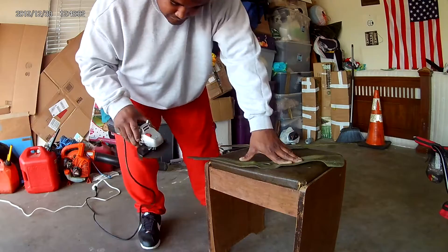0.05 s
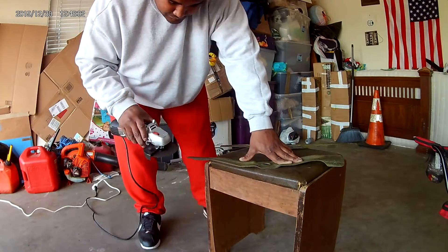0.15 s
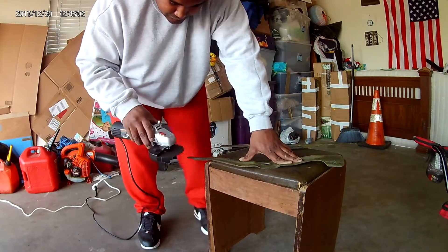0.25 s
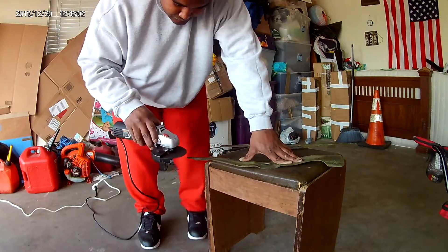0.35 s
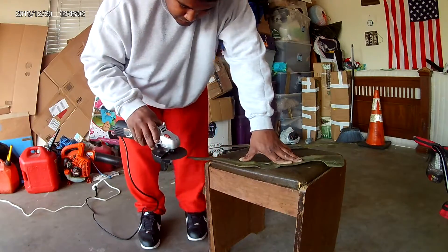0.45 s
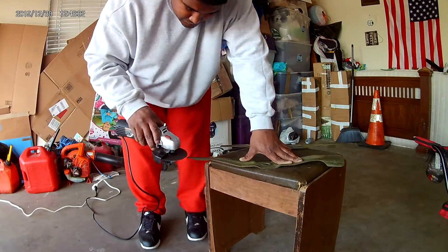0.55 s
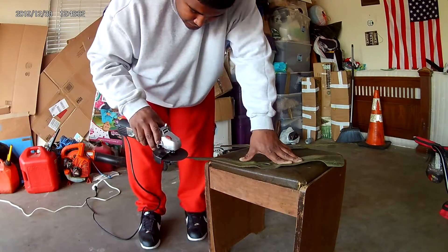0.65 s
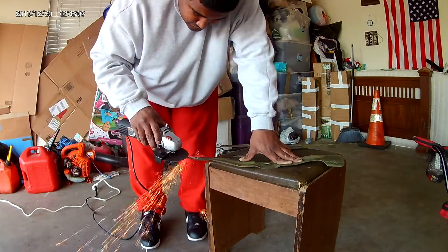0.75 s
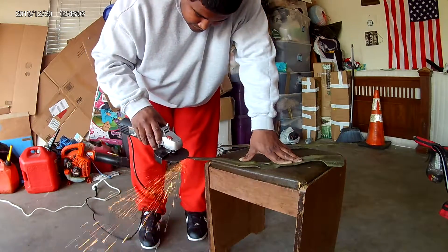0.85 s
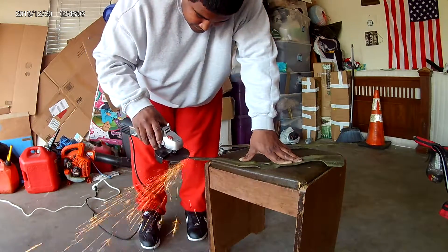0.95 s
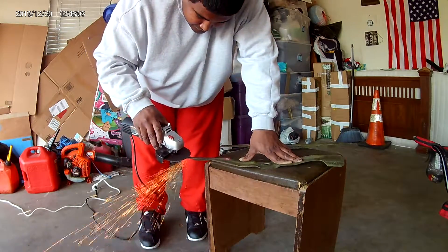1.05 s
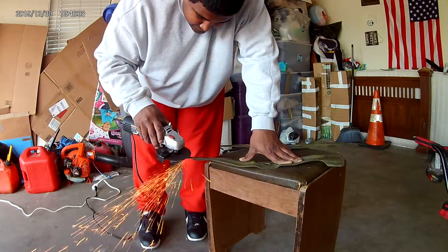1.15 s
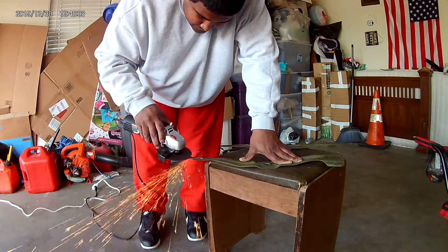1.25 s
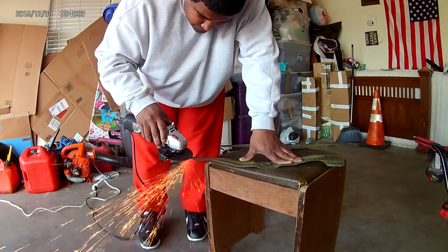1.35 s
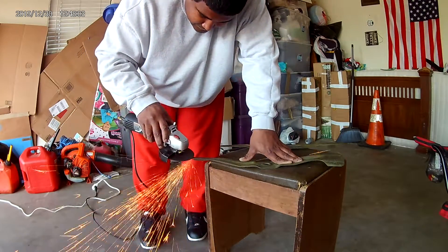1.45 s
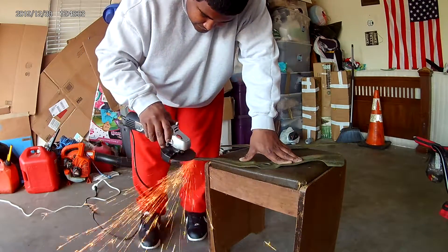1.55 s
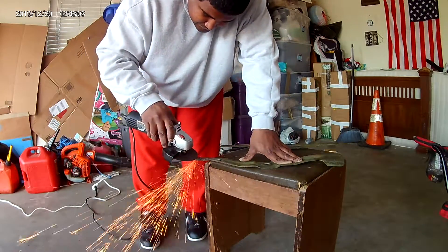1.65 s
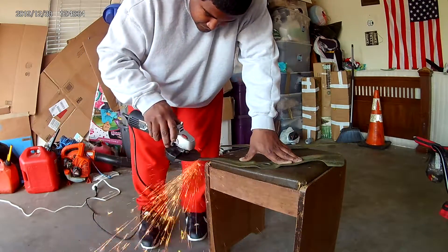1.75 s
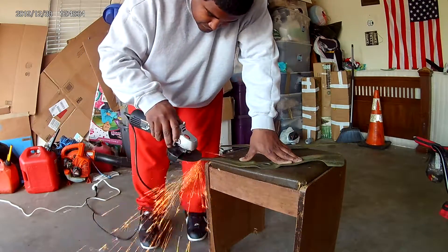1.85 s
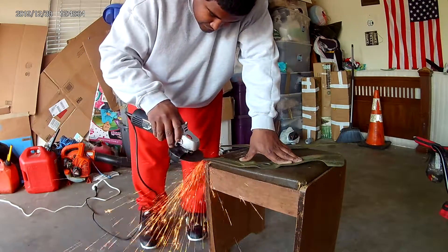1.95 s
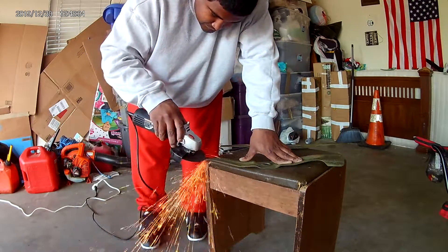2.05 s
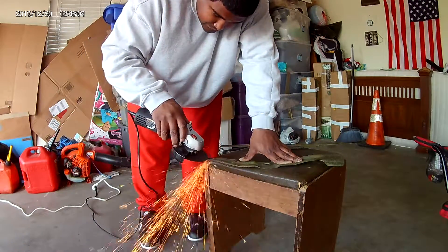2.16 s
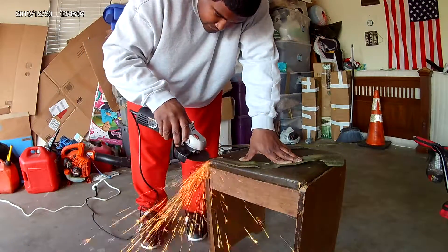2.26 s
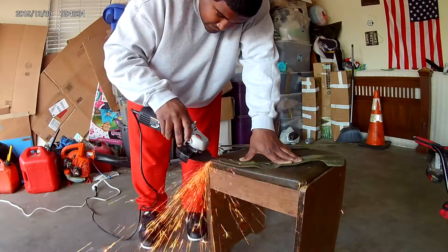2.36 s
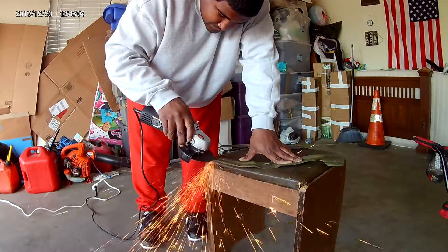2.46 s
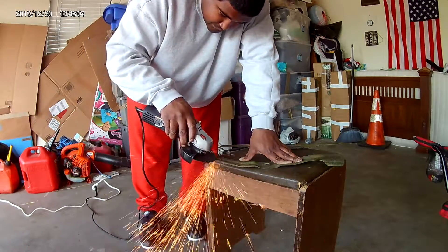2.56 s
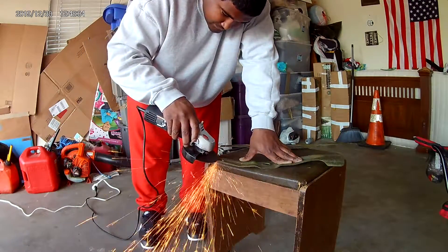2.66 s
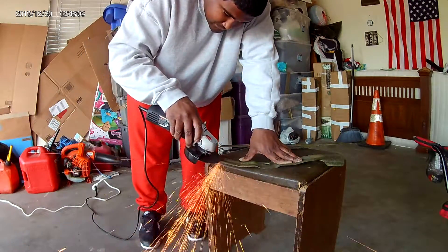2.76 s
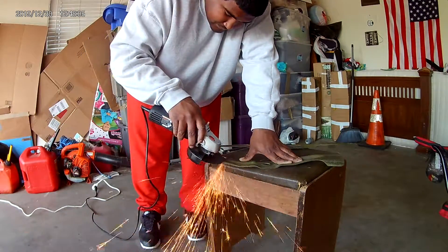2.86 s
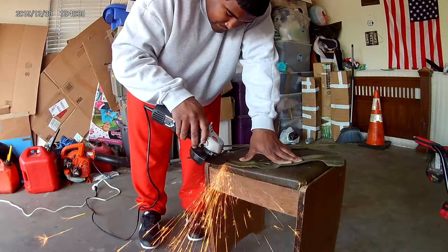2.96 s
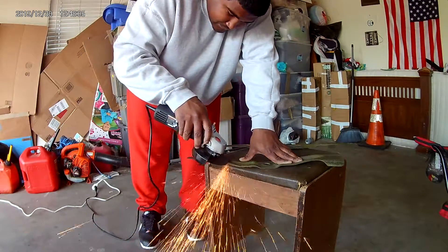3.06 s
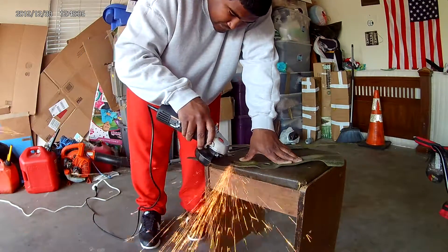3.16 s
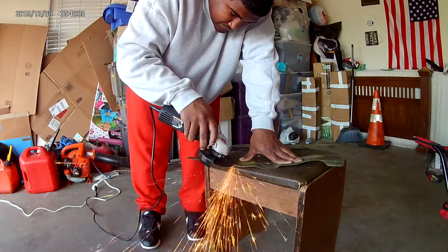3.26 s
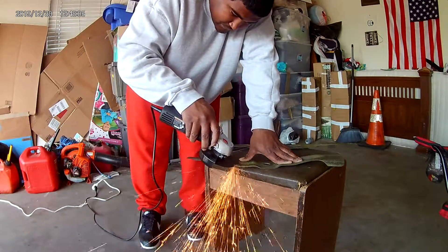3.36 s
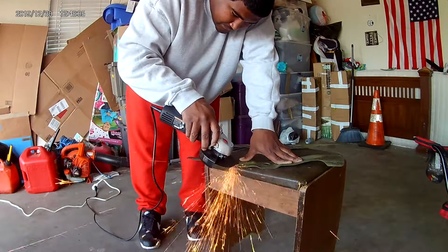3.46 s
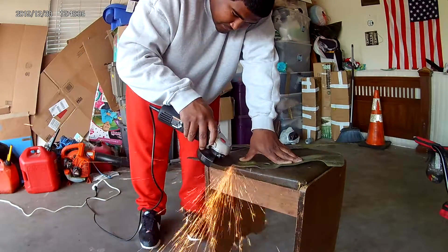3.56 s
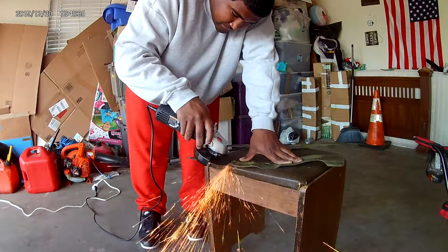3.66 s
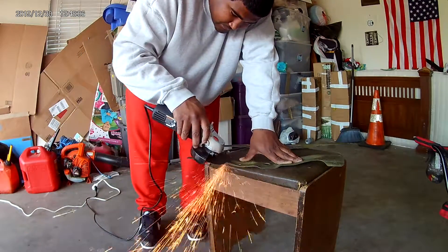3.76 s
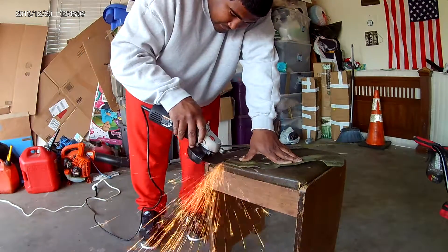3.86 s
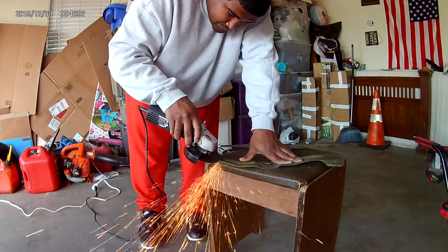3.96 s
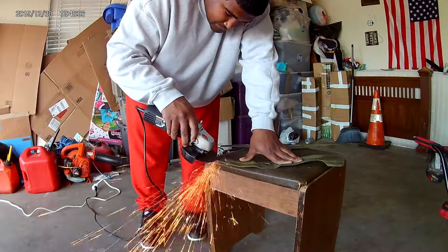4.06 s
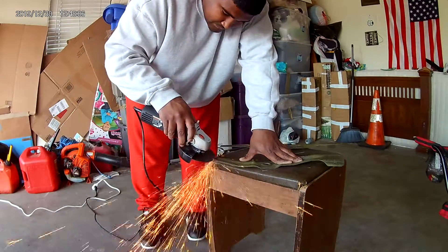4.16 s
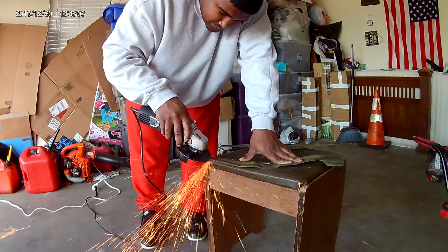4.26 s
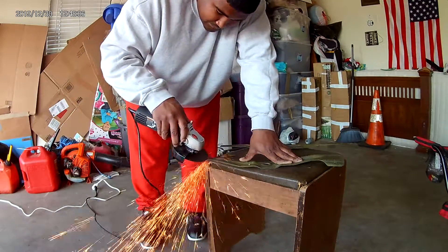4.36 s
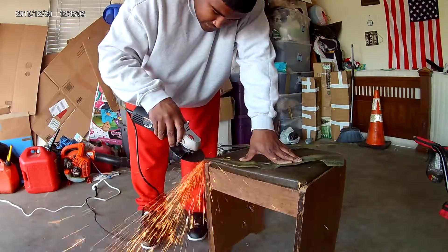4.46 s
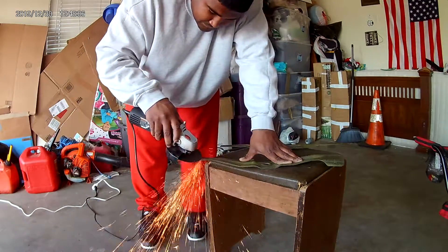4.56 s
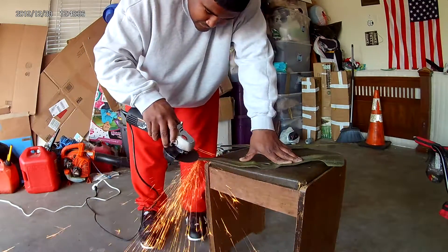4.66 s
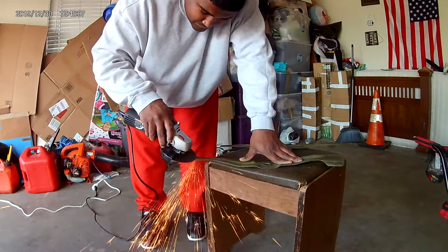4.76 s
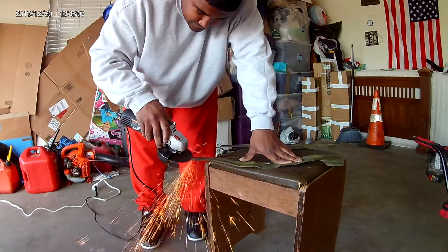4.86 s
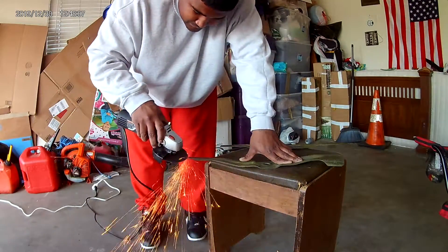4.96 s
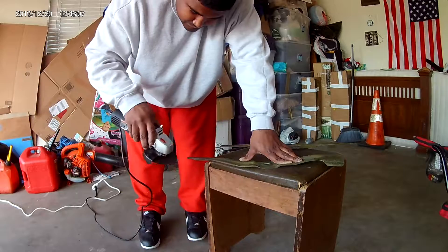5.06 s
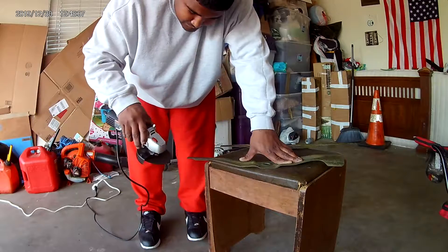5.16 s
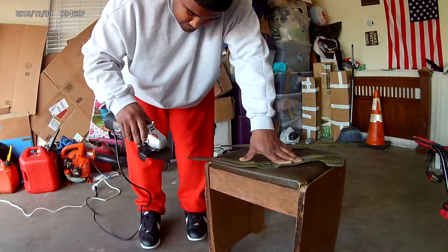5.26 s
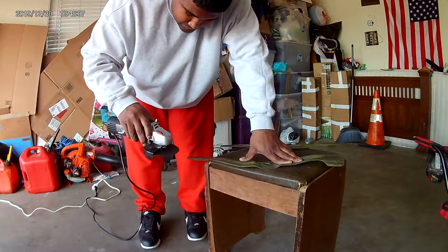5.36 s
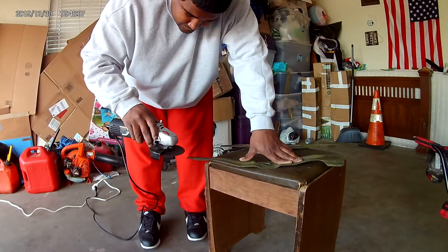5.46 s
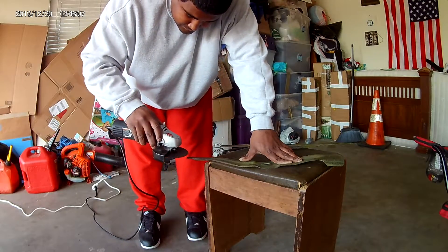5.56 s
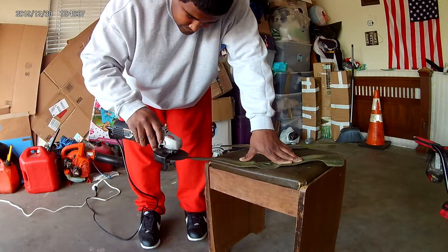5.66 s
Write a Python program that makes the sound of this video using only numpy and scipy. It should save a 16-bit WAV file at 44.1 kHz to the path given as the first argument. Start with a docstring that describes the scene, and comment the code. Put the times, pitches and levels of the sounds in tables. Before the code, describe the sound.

From 0 to 0.7 seconds an electric angle grinder spins freely, close by in a cluttered garage: a steady, slightly rattling geared whine with a broad airy fan rush, swelling early then dipping. At about 0.7 the disc bites a steel blade with a sudden rough screech, loudest and raspiest at first. One unbroken grinding pass follows until 5.0: dense buzzing grit, fast roughness from every disc turn, and overlapping metallic squeals, mostly around 2 to 4 kilohertz, that swell and die as the contact slides along the edge. Disc speed sags gradually by about a tenth until 4.3, lowering the tones, and a low hum grows as the blade is worked over the bench, strongest near 3.4. Around 5.0 the grinder lifts with a last brief screech, a low bump and a tiny hard snap. The free whine and fan rush return, rising quickly in pitch and holding to 5.7. Reverberation is short and dull.

```python
"""Angle grinder on a steel blade

An angle grinder runs free in a cluttered garage, is pressed on a steel blade for one long pass, and is lifted.
The uneven rim rubs the same pattern into the steel on every turn: a comb of lines on the sagging disc speed.
Lines swell in the blade's resonances as the contact slides along the edge, and many squeal in turn.
Shaped noise makes the rasping grit, screeches and rushing fan; sines make the hum and the motor tones.
"""
import sys
import numpy as np
from scipy import signal
from scipy.fft import rfft, irfft
from scipy.io import wavfile

SR = 44100
rng = np.random.default_rng(int(sys.argv[2]) if len(sys.argv) > 2 else 0)


def wav_record(signal):
    """Record a signal, one row per channel, as 16-bit PCM in the file named by sys.argv[1]."""
    frames = np.transpose(np.atleast_2d(signal))
    bounded = np.clip(frames, -1, 1)
    # unit amplitude maps onto the largest positive 16-bit level
    quanta = np.round(bounded * 32767).astype(np.int16)
    wavfile.write(sys.argv[1], SR, quanta)


N = 251804

# level of the motor whine, swelling and fading as the grinder moves through the garage's standing waves:
# start_s, level_db
WHINE_LEVEL = [(0, 3), (.2, 6.5), (.32, -1.5), (.65, -5.5), (1.3, 5.5), (2.1, 4.5), (2.4, -10), (2.8, 2),
               (5.71, 0)]
GEAR_RATIO = 37 / 12  # shaft turns per disc turn
PRESS_S, LIFT_S = 0.711, 5.03  # the disc meets and leaves the blade
ATTACK_S, RELEASE_S = 0.045, 0.024
CONTROL_COUNT = 3000  # points in a slow control


def undb(db):
    """Decibels to gain: 20 dB is a factor of ten in amplitude."""
    return np.exp(np.asarray(db) * (np.log(10) / 20))


def unit(x):
    """Normalisation to an rms of one."""
    return x / np.sqrt(np.mean(x ** 2))


def curve(rows):
    """Linear interpolation of (s, value) rows over the whole scene."""
    return np.interp(np.arange(N) / SR, *np.transpose(rows))


def stretch(x, size):
    """Linear resampling of a slow control to `size` points."""
    return np.interp(np.linspace(0, len(x) - 1, size), np.arange(len(x)), x)


def shape_db(hz, points):
    """Spectral envelope: (Hz, dB) points joined on a log-frequency axis."""
    point_hz, db = np.transpose(points)
    return np.interp(np.log(hz + 1), np.log(point_hz), db)


def colour(x, points):
    """Spectral filtering by a (Hz, dB) envelope; rms one."""
    bin_hz = np.arange(N // 2 + 1) * SR / N
    return unit(irfft(rfft(x) * undb(shape_db(bin_hz, points)), N))


def resonate(x, hz, width):
    """Simple resonance: a two-pole band-pass with gain one at its centre."""
    return signal.lfilter(*signal.iirpeak(hz, hz / width, fs=SR), x)


def walk(rate, size=N):
    """Random modulation with a spread near one and `rate` new values a second, in `size` steps."""
    at = np.linspace(0, N / SR * rate, size) + rng.random()
    knots = rng.standard_normal(4096)
    return np.sqrt(3 / 2) * np.interp(at, np.arange(len(knots)), knots)


def garage(x, t60=0.43, wet_db=-16):
    """Reverberation: short, dull, exponentially decaying reflections among stacked boxes."""
    t = np.arange(SR // 2) / SR
    tail = rng.standard_normal(len(t)) * np.exp(-np.log(1000) * t / t60) * (t > .005)
    tail = resonate(tail, 2740, 5400)
    tail /= np.sqrt(np.sum(tail ** 2))
    return x + undb(wet_db) * signal.fftconvolve(x, tail)[:N]


def disc_speed(free_hz=161.1, recover_s=0.38, hunt=0.00392, hunt_rate=5):
    """Motor load: the free disc hunts a little, sags while grinding and runs back up exponentially."""
    # disc speed, sagging under load: start_s, turns_hz
    loaded_speed = [(.72,161.6),(.88,160.2),(1.14,157.8),(1.6,153.1),(2,152.1),(2.25,150.4),(2.7,148.3),(3.28,147.7),(3.6,146.4),(4,145.9),(4.26,145.2),(4.74,146.3),(5.05,148.4)]
    t = np.arange(N) / SR
    before = np.clip((PRESS_S - t) / ATTACK_S, 0, 1)
    after = 1 - np.exp(-np.maximum(t - LIFT_S, 0) / recover_s)
    free = np.maximum(before, after)
    return free * free_hz * (1 + hunt * walk(hunt_rate)) + (1 - free) * curve(loaded_speed)


def contact():
    """Friction contact as a share of full grip, 0-1: a quick press, a long hold, a quick lift."""
    t = np.arange(N) / SR
    press = np.clip((t - PRESS_S) / ATTACK_S, 1e-4, 1)
    return press * np.exp(-np.clip((t - LIFT_S) / RELEASE_S, 0, 10))


def machine(turns, bite_db, rush_db=-33.5, rattle_db=1.94, swish=0.032, knock_db=2, knock_lag=0.058,
            scatter_db=2.0, loaded_db=-5, whine_share=0.03):
    """Turbulence and forced resonance: fan rush, and housing rings that slack gears knock, less under load."""
    # rush of the cooling fan and gears, relative spectrum: pitch_hz, level_db
    rush = [(30, -18), (100, -23), (220, -19.5), (380, -10), (650, -5), (850, -1.5), (1300, -0.5),
            (1700, -3), (2200, 3), (3200, -1), (4000, -3), (4260, -7.5), (4850, -4), (5250, -9.5),
            (5900, -1.5), (6400, -16), (6700, -5.5), (7200, -16), (8300, -32), (12500, -28), (15000, -60)]
    # resonances of the gear head and guard: pitch_hz, width_hz (of each of two passes), level_db
    housing = [(837, 146, -48), (1352, 270, -41), (2132, 91, -41), (3030, 92, -45.5), (3490, 100, -49),
               (3894, 117, -40)]
    load = np.clip(undb(bite_db), 0, 1)
    # shaft and disc drift in and out of step about 13 times a second, and the gears knock each time
    beat = np.cos(2 * np.pi * ((GEAR_RATIO % 1) * turns - knock_lag)) * (1 - load / 2)
    # the disc fans the air once a turn
    fanning = 1 + swish * np.sin(2 * np.pi * turns)
    out = colour(rng.standard_normal(N), rush) * fanning * undb(rush_db + rattle_db * walk(420))
    for hz, width, db in housing:
        knocks = rng.standard_normal(N) * undb(knock_db * beat + scatter_db * walk(160))
        out += undb(db) * unit(resonate(resonate(knocks, hz, width), hz, width))
    # all of it rises and falls very slightly with the whine and is quieter under load
    return out * undb(loaded_db * load + whine_share * curve(WHINE_LEVEL))


def motor(turns, lash=0.39, waver_db=2.5):
    """Harmonics of a geared shaft; lash is a phase modulation (rad) that smears the higher tones most."""
    # tones of the motor shaft and fan: shaft_multiple, level_db (before waver and whine level)
    shaft_tones = [(1, -45.5), (2, -44), (3, -45), (4, -46), (6, -55), (8, -50)]
    out, play = np.zeros(N), lash * walk(40)
    for multiple, db in shaft_tones:
        phase = multiple * (2 * np.pi * GEAR_RATIO * turns + play)
        out += undb(db + waver_db * walk(14)) * np.sin(phase)
    return out * undb(curve(WHINE_LEVEL))


def disc_whine(turns, grip, slip_rad=0.9, waver_db=2.5, whine_share=0.99):
    """Rotational harmonics of the free disc, wavering, that swell and fade along with the motor whine."""
    # tones of the spinning disc and gear head: disc_multiple, level_db (before waver and whine level)
    disc_tones = [(8, -57), (13, -48), (15, -53), (24, -53)]
    out = np.zeros(N)
    for multiple, db in disc_tones:
        phase = 2 * np.pi * multiple * turns + slip_rad * walk(40)
        out += undb(db + waver_db * walk(22)) * np.sin(phase)
    return out * (1 - grip) * undb(whine_share * curve(WHINE_LEVEL))


def wobble(turns, grip, place, free_db=-61.5, blade_db=-52, bench_db=-35, falloff_db=45, waver_db=1.0,
           free_octave_db=-63, octave_waver_db=2.0, bump_db=6, bump_s=0.02):
    """Radiation of the once-a-turn hum and its octave: faint in air, stronger on the blade and over the bench."""
    # level of the hum's octave while the disc grinds: start_s, level_db (before waver)
    octave_level = [(.8, -46.5), (1.02, -45), (1.2, -67), (1.45, -54), (2.12, -53), (2.38, -67),
                    (2.72, -49.5), (3.6, -48.5), (5, -46.5)]
    t = np.arange(N) / SR
    pressed = np.hypot(undb(blade_db), undb(bench_db - falloff_db * (1 - place)))
    # the hum swells briefly at the lift
    bump = bump_db * np.exp(-((t - LIFT_S) / bump_s) ** 2)
    size = np.hypot(undb(free_db), grip * pressed) * undb(bump + waver_db * walk(15))
    ground_octave = undb(curve(octave_level) + octave_waver_db * walk(11))
    octave = (1 - grip) * undb(free_octave_db) + grip * ground_octave
    return np.sqrt(2) * size * np.sin(2 * np.pi * turns) + octave * np.sin(4 * np.pi * turns)


def ticks(ring_s=0.00041, edge_hz=5500):
    """Impulsive excitation: a hard, very short snap as the rim flicks off the edge."""
    # snaps of the rim: start_s, peak_db
    snaps = [(5.05, -13.5)]
    out, t = np.zeros(N), np.arange(256) / SR
    soften = signal.butter(4, edge_hz, fs=SR, output="sos")
    for start_s, db in snaps:
        burst = rng.standard_normal(len(t)) * np.exp(-t / ring_s)
        snap = signal.sosfilt(soften, resonate(burst, 3600, 3700))
        first = int(start_s * SR)
        out[first:first + len(t)] += undb(db) * snap / np.abs(snap).max()
    return out


def recurring(turns, keep, count=6):
    """Comb filtering in the turn: a share `keep` of the grains strikes again, blurring noise into lines."""
    chips, keep = rng.standard_normal(N), np.clip(keep, 0, .9)
    out = chips.copy()
    for n in range(1, count):
        turns_ago = np.searchsorted(turns, turns - n)
        out += keep ** n * chips[turns_ago] * (turns > n)
    return unit(out)


def bursts(turns, depth):
    """Amplitude modulation: a short surge each time the high side of the rim comes round; rms one."""
    high_side = .5 + .5 * np.cos(2 * np.pi * turns)
    return unit(1 + depth * high_side ** 3)


def screech(turns, grip, throb=3.9, fade_s=0.086, ring_on_s=0.047, keep=0.46):
    """Forced resonance: where the disc digs in, bursts of grit on every turn shake broad bands of the blade."""
    # rough screeches: start_s, end_s (both at half size), pitch_hz, width_hz (of each pass), level_db
    screeches = [(.67, 1.056, 2340, 700, -31.5), (.67, .88, 3000, 2200, -37), (0.782, 1.35, 5920, 300, -45),
                 (1.267, 1.604, 2450, 600, -33.5), (1.3, 2.2, 5880, 600, -42.5),
                 (1.7, 2.022, 2460, 500, -36), (2.1, 2.26, 4650, 300, -40), (2.15, 2.554, 3600, 500, -40),
                 (3.15, 3.42, 2620, 400, -38.5), (3.326, 3.797, 2140, 700, -36),
                 (4.277, 4.546, 3400, 1396, -42), (4.6, 4.852, 2300, 806, -38),
                 (4.993, 5.11, 2174, 450.7, -31)]
    t, out = np.arange(N) / SR, np.zeros(N)
    for start, end, hz, width, db in screeches:
        chips = recurring(turns, keep) * bursts(turns, throb)
        swell = np.clip(np.minimum(t - start, end - t) / fade_s + .5, 0, 1)
        out += undb(db) * swell * unit(resonate(resonate(chips, hz, width), hz, width))
    # what still sounds at the lift rings on
    ring_on = np.exp(-np.maximum(t - LIFT_S, 0) / ring_on_s)
    return out * np.where(t < LIFT_S, grip, ring_on)


def first_bite(extra_db=4.0, fade_s=0.36):
    """Exponential decay of the extra rasp, in dB, after the disc first cuts into the edge."""
    return extra_db * np.exp(-np.maximum(np.arange(N) / SR - PRESS_S, 0) / fade_s)


def grit(turns, bite_db, rasp_db=-32.5, throb=0.81, grain=0.2, keep=0.22, surge_db=1.72, surge_rate=16):
    """Modulated noise: grains tear chips from the steel, thickest at the high side of the rim."""
    # rasp of the grit, relative spectrum: pitch_hz, level_db
    rasp = [(30, -37), (130, -11), (350, -21), (600, -6.5), (1200, -5.5), (1650, -3), (2300, -0.5),
            (3300, -5), (3750, -1.5), (4260, -9.5), (4700, -6.5), (5400, -5), (5750, -6.5), (6450, -16),
            (7250, -4), (7550, -10.5), (8100, -50), (9300, -15), (12500, -28.5), (15500, -52)]
    chips = recurring(turns, keep) * np.exp(grain * rng.standard_normal(N))
    torn = chips * bursts(turns, throb)
    return colour(torn, rasp) * undb(rasp_db + bite_db + surge_db * walk(surge_rate))


def ringing(hz, place):
    """Modal resonance: a line swells as it glides through a blade mode, unless the disc is near a node."""
    # bending modes: pitch_hz, width_hz, level_db (relative), half_waves (between tip and hand)
    blade_modes = [(1055, 44, -37.5, 0.8), (1440, 20.6, -38, 1.55), (1690, 23, -43, 2.217),
                   (1938, 34, -32, 2.12), (2116, 39, -22.5, 1.34), (2730, 45, -38, 0.5),
                   (2960, 39, -41.5, 1.4), (3138, 74, -31.5, 1.9), (3600, 43, -26, 2.4),
                   (4126, 28, -35.5, 3.1)]
    size = 0
    for mode_hz, width, db, half_waves in blade_modes:
        if hz.min() - width < mode_hz < hz.max() + width:
            mode_shape = np.abs(np.cos(np.pi * half_waves * place))
            size = size + undb(db) * mode_shape / (1 + ((hz - mode_hz) / width * 2) ** 2)
    return size


def squealing(k, fade_share=0.61, spill_db=-17, gain_db=-0.06):
    """Mode locking: the blade locks to line k, which swells, drags its neighbours along, and dies."""
    # squeals: start_s, end_s (both at half size), turn_multiple, level_db (before gain_db)
    squeals = [(0.75, 0.888, 13, -24), (0.75, 0.88, 42, -34.5), (0.745, 0.92, 29, -33.5), (0.7, 1, 36, -38),
               (.83, 0.98, 14, -27), (0.82, .99, 9, -33), (0.87, 1.217, 7, -38.5), (0.99, 2.26, 3, -43),
               (0.923, 1.11, 12, -26), (.9, 1.218, 15, -32.5), (.96, 1.25, 17, -30), (1.02, 1.447, 25, -31),
               (1.254, 1.4, 15, -26), (1.245, 1.562, 9, -25), (1.24, 1.53, 6, -36), (1.23, 1.55, 17, -34),
               (1.4, 1.61, 14, -23), (1.44, 1.72, 12, -32), (1.5, 1.75, 11, -36), (1.45, 1.69, 44, -34),
               (1.43, 1.81, 48, -34.5), (1.66, 2.003, 16, -27), (1.65, 1.84, 17, -31.5),
               (1.72, 2.13, 18, -32), (1.72, 2.14, 39, -42), (1.68, 2.05, 9, -33.5),
               (1.73, 2.14, 25, -27.5), (1.725, 2.04, 14, -25), (2.01, 2.214, 14, -24),
               (2.15, 2.7, 7, -39.5), (2.12, 2.44, 16, -31.5), (1.95, 2.11, 48, -34.5),
               (1.9, 2.38, 26, -35), (2.1, 2.58, 21, -33.5), (2.08, 2.56, 19, -33), (2.19, 2.74, 24, -33.5),
               (2.21, 2.588, 25, -28), (2.297, 2.656, 14, -26.5), (2.2, 3.17, 18, -34), (2.5, 3.6, 14, -34),
               (2.1, 3.367, 12, -36.5), (2.59, 2.9, 36, -31), (2.9, 3.33, 25, -30.5), (3.4, 3.85, 25, -35),
               (3.17, 3.45, 16, -36), (3.2, 3.57, 24, -34.5), (2.85, 4, 48, -36), (3.09, 3.44, 17, -33.5),
               (3.1, 3.55, 18, -35.5), (3.21, 3.54, 28, -36.5), (3.21, 3.77, 7, -34), (3.34, 3.97, 12, -30),
               (3.31, 3.78, 13, -30), (3.3, 3.87, 9, -33.5), (3.372, 3.616, 15, -25), (3.4, 3.69, 36, -34),
               (3.65, 4, 19, -34), (3.85, 4.24, 10, -29.5), (3.75, 4.1, 16, -29), (4.04, 4.6, 16, -26),
               (3.78, 4.12, 36, -38), (3.98, 4.38, 13, -31), (4.072, 4.375, 48, -32), (4.12, 4.6, 32, -31),
               (4.02, 4.5, 36, -32), (4.179, 4.55, 25, -29.5), (4.29, 4.98, 10, -28), (4.248, 5, 6, -35.5),
               (4.25, 4.56, 27, -35), (4.29, 4.578, 19, -34), (4.33, 4.55, 21, -36),
               (4.58, 4.86, 14, -23.5), (4.6, 4.92, 16, -35), (4.64, 4.97, 13, -34), (4.56, 4.89, 15, -27),
               (4.62, 5, 19, -37), (4.58, 5.02, 49, -32), (4.72, 5.05, 7, -32.5), (4.7, 5, 36, -40),
               (4.77, 5, 46, -32.5)]
    t, power = np.linspace(0, N / SR, CONTROL_COUNT), 0
    for start, end, multiple, db in squeals:
        apart = abs(round(multiple) - k)
        if apart <= 1:
            fade_s = fade_share * (end - start)
            rise = np.clip(np.minimum(t - start, end - t) / fade_s + .5, 0, 1)
            size = undb(db + gain_db + spill_db * apart) * np.sin(np.pi / 2 * rise) ** 2
            power = power + size ** 2
    return np.sqrt(power)


def rubbing(turns, disc_hz, bite_db, place, waver_db=3.5, waver_rate=7, slip_rad=0.16, slip_rate=8,
            flutter_db=1.31, scuff=0.79, scuff_rate=35, scuff_hz=4200, squeal_scuff=0.22,
            skid_turns=0.0009, rim_waver=0.99, ring_db=-2.0):
    """Periodic friction: the rim repeats its pattern every turn, a comb of wavering lines that grit breaks up."""
    # strength of the rubbing comb, per line: pitch_hz, level_db (before waver)
    comb = [(300, -85), (440, -47.5), (620, -58), (900, -41.5), (1150, -50.5), (1400, -35.5), (1620, -54.5),
            (1850, -45), (2200, -37.5), (2650, -40.5), (3300, -47), (3650, -43), (4300, -53), (4650, -45),
            (5200, -52.5), (5700, -43), (6500, -53.5), (7200, -41), (7800, -73), (9200, -49.5),
            (10300, -74), (11000, -54), (12600, -61), (13400, -77), (14300, -62.5), (15500, -83)]
    # low lines that the bench radiates: turn_multiple, level_db (relative to the bench's shaking)
    bench_lines = dict([(4, -42), (5, -48.5), (6, -56.5), (7, -49), (8, -59), (10, -56)])
    # lines that the uneven rim stresses: turn_multiple, level_db (before waver)
    rim_lines = dict([(12, -42), (14, -38.5), (25, -49.5), (36, -47), (47, -50), (48, -55)])
    disc_hz, bite, place = (stretch(c, CONTROL_COUNT) for c in (disc_hz, undb(bite_db), place))
    grip = stretch(contact(), CONTROL_COUNT)
    # the bench shakes more once the blade lies on it, from an overhang to a support around place 0.48
    overhang_db, supported_db = -15, 5
    supported = np.clip((place - 0.48) / 0.32 + .5, 0, 1)
    bench_db = overhang_db + (supported_db - overhang_db) * supported
    # the contact point skids a little around the rim
    spin = np.exp(2j * np.pi * (turns + skid_turns * walk(40)))
    out, line = np.zeros(N), spin
    for k in range(2, 103):
        hz, line = k * disc_hz, line * spin
        # the levels of higher lines waver more deeply than those of the lowest
        waver = waver_db * k / (k + 6) * walk(waver_rate, CONTROL_COUNT)
        power = undb(shape_db(hz, comb) + waver) ** 2 + (undb(ring_db) * ringing(hz, place)) ** 2
        if k in rim_lines:
            power += undb(rim_lines[k] + rim_waver * waver) ** 2
        if k in bench_lines:
            power += undb(bench_lines[k] + bench_db) ** 2
        rubbed, locked = bite * np.sqrt(power), grip * squealing(k)
        # loose grit breaks up the high lines, the squeals least
        rough = scuff * hz ** 2 / (hz ** 2 + scuff_hz ** 2)
        rough = rough * (rubbed + squeal_scuff * locked) / (rubbed + locked)
        scatter = walk(scuff_rate, CONTROL_COUNT) + 1j * walk(scuff_rate, CONTROL_COUNT)
        broken = (1 + rough * scatter) / np.sqrt(1 + 2 * rough ** 2)
        flutter = undb(flutter_db * walk(28.02, CONTROL_COUNT))
        size = np.maximum(rubbed, locked) * broken * flutter
        drift = 2 * np.pi * rng.random() + slip_rad * walk(slip_rate, CONTROL_COUNT)
        out += (stretch(size * np.exp(1j * drift), N) * line).imag
    return out


def scene():
    """Superposition: disc speed, bite and the place on the edge drive the layers, which add in the garage."""
    # how hard the hand presses, as a scraping level: start_s, level_db
    pressure = [(.8, -2), (1.2, -1.5), (2.1, 0), (2.9, -0.5), (3.5, 0), (3.9, -1.5), (4.5, 0.5), (5, 1)]
    # where the disc touches the edge: start_s, place (overhanging tip 0 to holding hand 1)
    edge_place = [(.75, 0.068), (2.2, 0.47), (2.7, 0.69), (3.44, 1), (4.1, 0.74), (4.6, 0.66), (5, 0.82)]
    disc_hz, grip, place = disc_speed(), contact(), curve(edge_place)
    bite_db = 20 * np.log10(grip) + curve(pressure)
    # turns made so far, with a slight random jitter of the speed
    turns = np.cumsum(disc_hz * (1 + 0.000468 * walk(25.04))) / SR
    running = machine(turns, bite_db) + motor(turns) + disc_whine(turns, grip)
    hum = wobble(turns, grip, place)
    rough = ticks() + screech(turns, grip) + grit(turns, bite_db + first_bite())
    steel = rough + rubbing(turns, disc_hz, bite_db, place)
    return garage(running + hum + steel)[None]


def record(dry):
    """Low-pass filtering: a steep elliptic filter cuts the treble above 15.6 kHz."""
    return signal.sosfilt(signal.ellip(8, .2, 70, 15600, fs=SR, output="sos"), dry)


dry = scene()
out = record(dry)
wav_record(out)
```